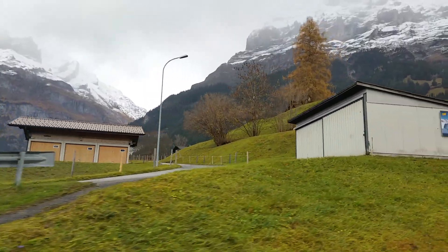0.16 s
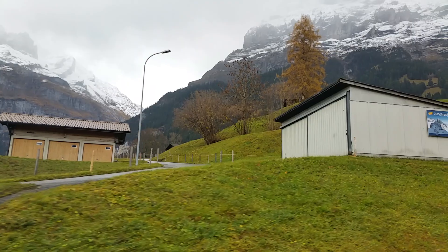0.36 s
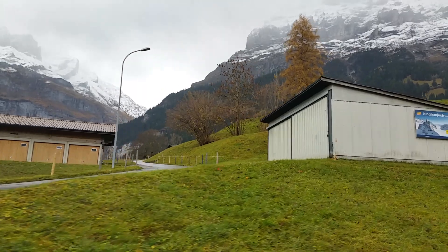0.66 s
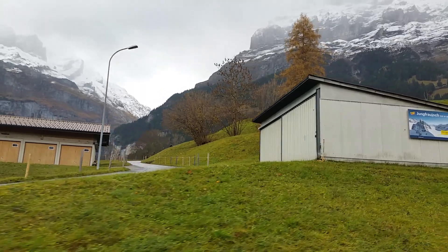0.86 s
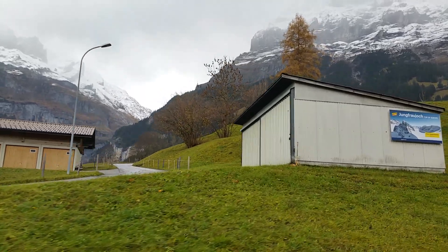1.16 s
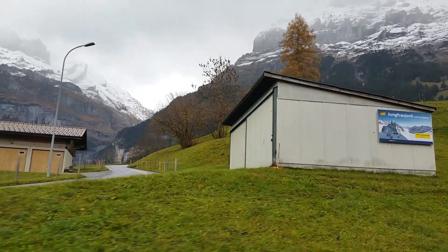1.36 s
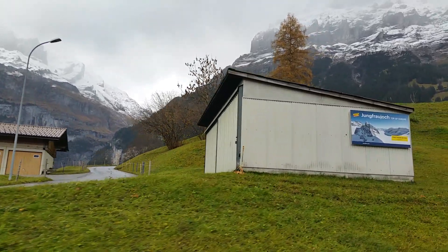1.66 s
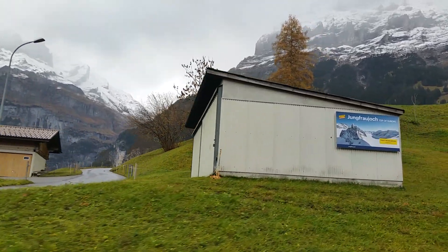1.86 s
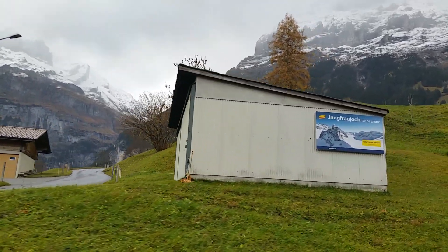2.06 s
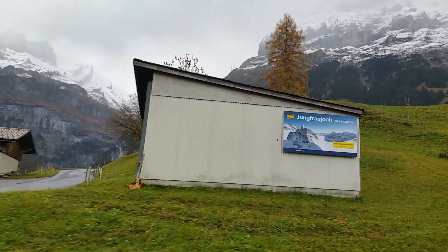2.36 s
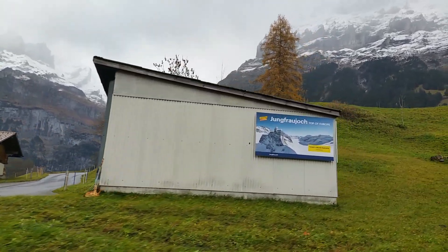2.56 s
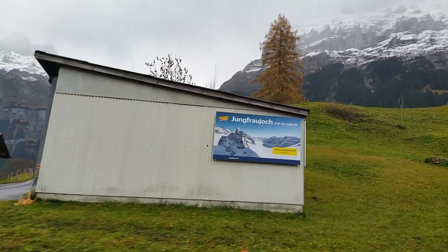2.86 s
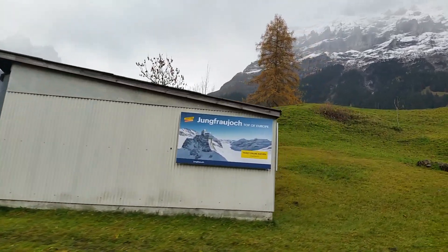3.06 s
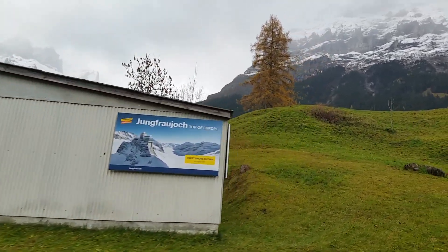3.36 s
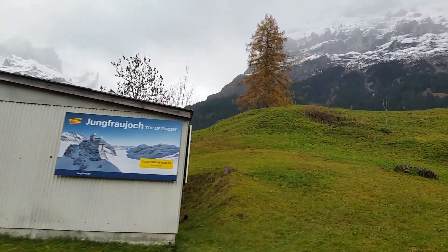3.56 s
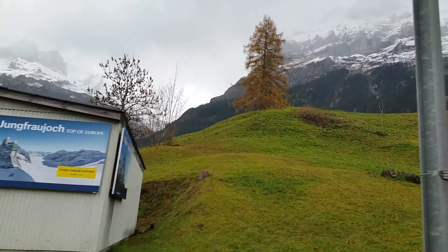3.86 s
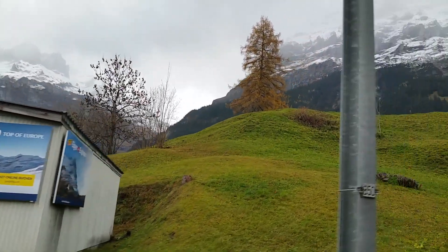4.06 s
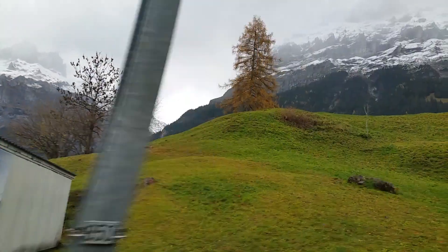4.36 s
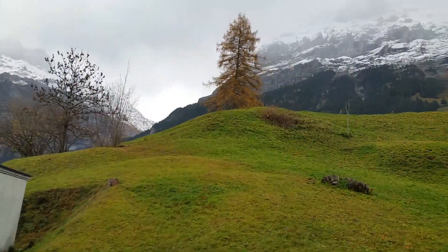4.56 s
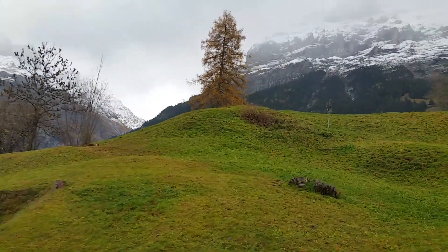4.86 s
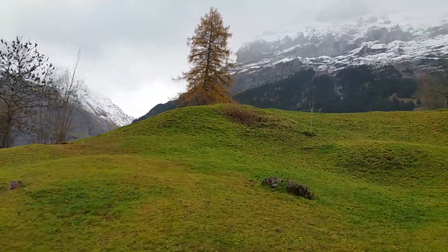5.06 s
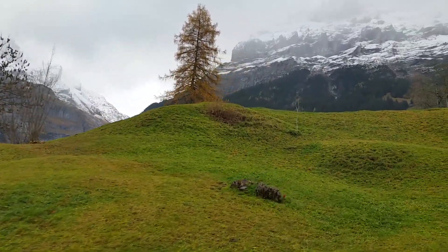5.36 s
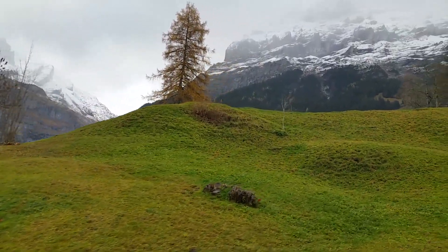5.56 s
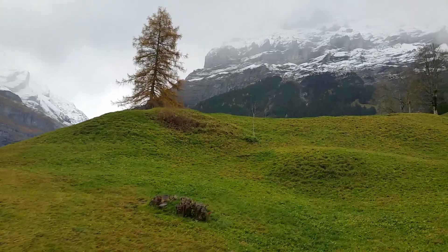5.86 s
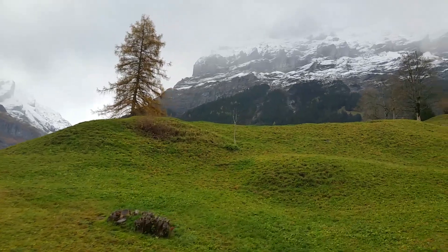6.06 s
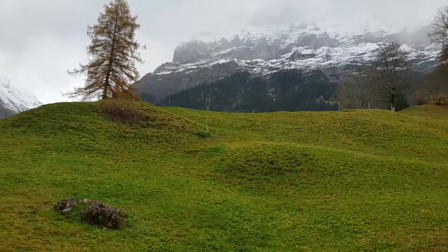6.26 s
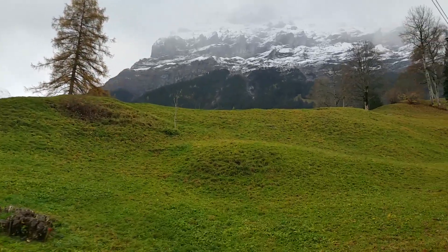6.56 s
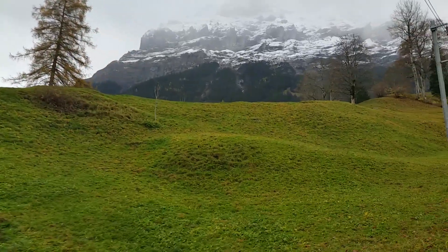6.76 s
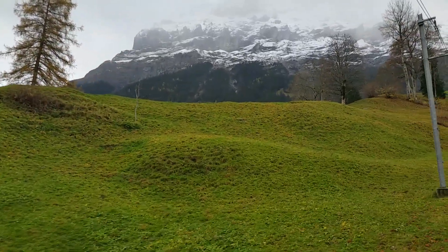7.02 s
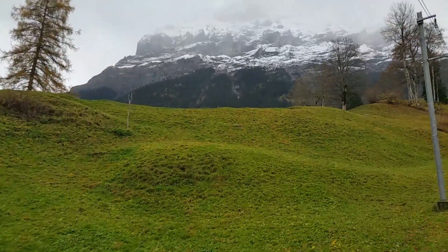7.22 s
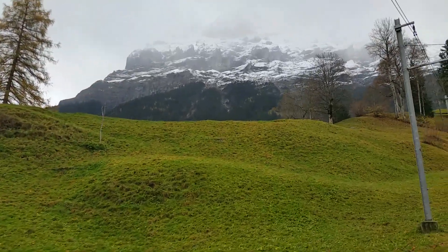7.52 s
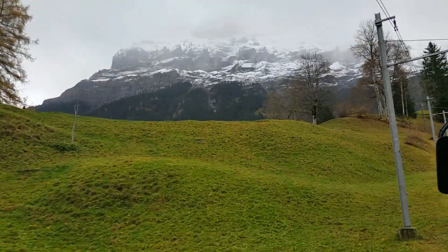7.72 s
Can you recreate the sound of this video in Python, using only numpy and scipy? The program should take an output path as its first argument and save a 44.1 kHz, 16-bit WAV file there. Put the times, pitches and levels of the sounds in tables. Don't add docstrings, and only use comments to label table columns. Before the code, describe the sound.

A steady low electric hum with a rough, throbbing edge over rumbling wheels and gusty hiss, with two dull knocks near the middle.

```python
import sys
import numpy as np
from scipy import signal
from scipy.fft import rfft, irfft, next_fast_len
from scipy.io import wavfile

SR = 44100
rng = np.random.default_rng(int(sys.argv[2]) if len(sys.argv) > 2 else 0)


def store_wav(level_fs):
    pcm = np.round(np.clip(np.atleast_2d(level_fs), -1, 1) * 32767)
    wavfile.write(sys.argv[1], SR, pcm.T.astype(np.int16))


def volts(x):
    e = np.asarray(x, float) / 20
    return 10 ** e


N = 347949
SIZE = next_fast_len(N)
HZ = np.arange(SIZE // 2 + 1) * SR / SIZE
STEP = 8

# time in seconds, teeth per second in Hz.
TOOTH_RATE = [(0.0, 55.26), (1.0, 55.08), (2.0, 54.93), (3.0, 54.7), (4.0, 54.48), (5.0, 54.22),
              (6.0, 54.04), (7.0, 53.88), (7.89, 53.83)]
TOOTH_ORDERS = [1, 2, 4, 5, 6, 7, 8, 9, 10, 11, 13, 14]
# line level early, midway and late in dB, rough skirt in dB.
TOOTH_LEVELS = [(-37, -51, -81, -37.5), (-25.5, -29, -32.5, -57), (-34, -28.5, -29.5, -38.5),
                (-29.5, -45.5, -40.5, -34), (-31, -33.5, -31, -36), (-41, -40, -45, -44.5),
                (-40.5, -50, -47, -45), (-40, -55.5, -42, -42.5), (-48.5, -41.5, -45, -42),
                (-48, -79, -55, -56), (-58, -45, -57, -49), (-60, -61, -54, -44.5)]
GEAR_ORDERS = [4.11, 4.855, 5.87, 6.1, 9.15, 12.2, 17.213, 18.3, 24.4, 27.45, 34.43]
# line level early, midway and late in dB, rough skirt in dB.
GEAR_LEVELS = [(-39.5, -32, -36, -51), (-44, -33.5, -40, -42), (-36, -55, -38, -68),
               (-24.5, -43.5, -37.5, -45), (-50, -33.5, -66, -46), (-33, -35.5, -41, -44.5),
               (-48, -43, -39.5, -49.5), (-57, -52, -43.5, -61), (-75, -51, -43.5, -49),
               (-65, -49, -53.5, -57), (-83, -60, -68, -47.5)]
# time in seconds, level of the third tooth tone in dB.
EFFORT = [(0.0, -20), (1.31, -17.6), (2.63, -25.5), (3.94, -23.5), (5.26, -19), (6.57, -19.5), (7.89, -19)]
# time in seconds, change in dB, half length in seconds.
SNATCHES = [(0.48, -10, 0.029), (0.95, -9, 0.032), (1.09, -9.2, 0.018), (1.72, -2, 0.034),
            (2.04, 4.9, 0.13), (2.24, 4.5, 0.06), (2.37, 3, 0.04), (2.74, 7.1, 0.038), (3.02, -26, 0.018),
            (3.18, 8, 0.16), (3.41, 5.0, 0.027), (3.49, -6, 0.025), (3.6, 7, 0.075), (4.2, 4.5, 0.067),
            (4.4, 8, 0.046), (4.56, -4.8, 0.054), (4.98, 4, 0.19), (5.45, 2.5, 0.084), (6.14, 4, 0.051),
            (6.48, 3.5, 0.04), (6.75, -4, 0.11), (7.13, -7, 0.046)]

# frequency in Hz, level in dB per Hz.
RUMBLE_SPECTRUM = [(20, -71), (35, -60), (52, -45), (75, -52.5), (100, -52.5), (140, -47.5), (190, -50.5),
                   (300, -57.5), (420, -59), (620, -56.5), (800, -60), (1100, -69), (1600, -70.5),
                   (2300, -75)]
# frequency in Hz, width in Hz, level in dB.
CASING_RESONANCES = [(64, 8, -7.5), (154, 21, 5), (169.5, 8.2, 0), (212, 33, 3.5), (688, 33, 1.5),
                     (752, 12, -12.5), (843, 24, 1.5), (1184, 18, 5), (1450, 48, 4.5), (1660, 30, 2.5),
                     (2004, 48, 4), (2380, 23, 6.5)]
# time in seconds, rumble change in dB, whir change in dB, half length in seconds.
SHUDDERS = [(.12, 0.5, 0.5, 0.033), (.32, 1, 2, 0.099), (.54, 1, -2.5, 0.16), (1.79, 1.5, 2, 0.017),
            (2.15, 0.3, 2.2, 0.08), (2.52, 2, -0.5, 0.044), (3.7, 0, 3, 0.12), (3.868, 3, 6, 0.012),
            (4.02, 0, 1, 0.11), (4.274, 3.5, 5, 0.015), (5.36, 0.9, -2.2, 0.088), (6.43, 5.5, 2, 0.018),
            (6.81, 1, -0.9, 0.37), (7.32, 0.5, -2, 0.026)]

# frequency in Hz, level in dB per Hz.
HISS_LEFT = [(2300, -83.0), (2800, -81.1), (3300, -84.5), (3950, -79.8), (5000, -82.8), (6200, -87.0),
             (7000, -92.2), (7700, -95.2), (8300, -89.1), (9000, -85.6), (10500, -85.8), (12500, -88.7),
             (14000, -90.9), (14500, -92.7)]
# frequency in Hz, level in dB per Hz.
HISS_RIGHT = [(2750, -81.5), (3350, -83.0), (4100, -72.8), (5000, -70.4), (5800, -74.1), (6800, -83.2),
              (7700, -95.3), (8300, -87.8), (9200, -86.0), (10100, -89.2), (10900, -96.3), (12800, -88.2),
              (14000, -91.9), (14500, -93.0)]
# time in seconds, hiss level in dB.
AIR = [(0, -47.5), (1.3, -46), (2.6, -43.5), (3.95, -42.5), (5.25, -45.5), (6.6, -45.5), (7.89, -47)]
# time in seconds, change in dB, half length in seconds.
PUFFS = [(.06, -3.5, 0.045), (.77, -1.5, .06), (.97, 3.5, .015), (1.14, 2.2, 0.028), (1.31, 4, .04),
         (1.69, 4.2, .025), (2.17, 2.2, 0.11), (2.43, 2, .04), (2.92, 2.5, 0.027), (3.17, 3, .04),
         (3.44, 2.4, .04), (3.67, 3, 0.02), (4.3, 3.5, 0.052), (4.4, -5, 0.013), (4.47, 5, .025),
         (4.73, 5, 0.068), (4.88, 4.5, 0.053), (5.16, 3.5, .04), (5.61, 2.5, 0.15), (5.97, 1.9, .06),
         (6.31, 3.1, 0.068), (6.45, -3, .025), (7.25, -2, 0.073), (7.45, 3.5, 0.022), (7.54, -2.5, 0.028)]
# time in seconds, level in dB, length in seconds, left minus right in dB.
GUSTS = [(.19, -28, 0.018, 4), (.85, -25, .04, 2), (0.956, -35, .02, 4), (3.68, -36, .02, -4),
         (6.6, -30, 0.055, 1), (7.626, -31.5, 0.09, 5)]

# time in seconds, level in dB, bright share in dB, deep share in dB.
JOINTS = [
    (3.856, -20, 4, -20),
    (3.859, -10.5, -8, -22),
    (3.8795, -10, -22, -20),
    (4.2645, -8, -6, -15),
    (4.282, -24, -8, 2),
    (4.296, -23, -9, 8),
    (4.325, -30, 0, 11),
    (4.355, -25, -12, 9),
]
# frequency in Hz, level in dB, time to fall 60 dB in seconds.
FLOOR_MODES = [(160, -2, .05), (230, 0, .07), (290, -4, .06), (400, -9, .04)]
# frequency in Hz, level in dB, time to fall 60 dB in seconds.
WHEEL_MODES = [(540, -3, .05), (660, -8, .05), (1050, -6, .06), (1450, -16, .05)]
# frequency in Hz, level in dB, time to fall 60 dB in seconds.
DEEP_MODES = [(50.2, 3, .4), (59, -6, .23), (71.7, -2.5, .2)]

# frequency in Hz, left minus right in dB.
LEAN = [(40, -7), (110, -4), (165, -5.5), (370, -3.5), (670, -2), (1200, -2.5), (2300, -3)]
# frequency in Hz, share from 0 to 1.
ALIKE = [(30, 0.67), (80, 0.69), (150, 0.84), (300, 0.78), (470, 0.57), (700, 0.82), (1100, 0.58),
         (1800, 0.54), (2300, 0.15)]
# time in seconds, lag in samples.
RIGHT_LAG = [(0, 10), (5, 10), (7.89, 5)]


def rms_one(x):
    return x / np.sqrt(np.mean(np.abs(x) ** 2) + 1e-20)


def in_time(rows):
    s, *columns = np.transpose(rows)
    return [np.interp(np.arange(N) / SR, s, c) for c in columns]


def at_hz(points, hz):
    table_hz, values = np.array(points).T
    return np.interp(np.log(hz + 1), np.log(table_hz), values)


def drift(rate_hz, step=1):
    r = np.exp(-2 * np.pi * 64 * rate_hz / SR)
    slow = signal.lfilter([1], [1, -2 * r, r * r], rng.standard_normal(N // 64 + 2002))[2000:]
    return np.interp(np.arange(0, N, step) / 64, np.arange(len(slow)), rms_one(slow))


def bumps(rows, column=1):
    t = np.arange(0, N + 64, 64) / SR
    db = sum(row[column] * np.exp(-((t - row[0]) / row[-1]) ** 2) for row in rows)
    return np.interp(np.arange(N) / SR, t, db)


def throb(turns, swing_db, lag):
    return swing_db * np.cos(2 * np.pi * (turns / 20 - lag))


def split(spectrum, edges):
    below = [0] + [1 / (1 + (HZ / edge) ** 10) for edge in edges] + [1]
    return [irfft(spectrum * (upper - lower), SIZE)[:N] for lower, upper in zip(below, below[1:])]


def order_tone(turns, order, line_db, skirt_db, skirt_hz):
    phase = 2 * np.pi * (order * turns + 0.036 * order ** 2)
    strength = volts(line_db) * np.sqrt(2) + volts(skirt_db) * drift(skirt_hz, STEP)
    timing_shake = volts(skirt_db) * drift(skirt_hz, STEP)
    return strength * np.cos(phase) + timing_shake * np.sin(phase)


def drive(turns, third_db):
    turns = turns[::STEP] + 0.004 * drift(2.8, STEP)
    out = order_tone(turns, 3, third_db[::STEP] - 0.6, skirt_db=-36.5, skirt_hz=18.0)
    place = np.linspace(0, 1, len(turns))
    teeth = (TOOTH_ORDERS, TOOTH_LEVELS, 1.5, 1.5)
    gears = (GEAR_ORDERS, GEAR_LEVELS, 2.2, 3.0)
    for orders, rows, wander_db, wander_hz in (teeth, gears):
        for order, (*levels, skirt_db) in zip(orders, rows):
            line_db = np.interp(place, [0, 0.5, 1], levels) + wander_db * drift(wander_hz, STEP)
            out += order_tone(turns, order, line_db, skirt_db, skirt_hz=11.1)
    return signal.resample_poly(out, STEP, 1)[:N]


def body(turns):
    t = np.arange(N) / SR
    shake_db, shake_hz = 0.9, 4.2
    shed_db = 2 / (1 + np.exp((t - 5) / 0.41 * 2))
    rumble_db = shed_db - 0.3 * t / t[-1] + bumps(SHUDDERS)
    whir_db = 0.5 * t / t[-1] + bumps(SHUDDERS, column=2) + throb(turns, 0.2, lag=0.055)
    return rumble_db + shake_db * drift(shake_hz), whir_db + shake_db * drift(shake_hz)


def rumble(turns, rumble_db, whir_db):
    casing_db = sum(level_db / (1 + (2 * (HZ - hz) / width) ** 2) for hz, width, level_db in CASING_RESONANCES)
    gain = volts(at_hz(RUMBLE_SPECTRUM, HZ) + 2.5 + casing_db) * np.sqrt(SR / 2)
    gain = gain / (1 + (HZ / 2450) ** 16)
    low, middle, whir = split(rfft(rng.standard_normal(N), SIZE) * gain, (330, 1000))
    pulse = 1 + 0.041 * np.cos(2 * np.pi * turns)
    low = low * volts(0.74 * drift(1.0) + np.linspace(0, -2.5, N))
    middle = middle * pulse * volts(1.93 * (rumble_db - rumble_db.mean()))
    return low + middle + whir * volts(1.04 * (whir_db - whir_db.mean()))


def hiss(level_db):
    out = np.zeros((2, N))
    grit_db = 0.58 * drift(36.0) + 0.3 * drift(24.0)
    swell_db = level_db - level_db.mean() + grit_db
    for side, spectrum in enumerate((HISS_LEFT, HISS_RIGHT)):
        gain = volts(at_hz(spectrum, HZ) + 0.5) * np.sqrt(SR / 2) / (1 + (2300 / (HZ + 1)) ** 12)
        bands = split(rfft(rng.standard_normal(N), SIZE) * gain, (3200, 5200, 7700, 11000))
        bands[0] = bands[0] * volts(4.0)
        for band, follow in zip(bands, (0.54, 0.77, 1.28, 0.88, 0.49)):
            flicker_db = 1.0 * drift(17.0)
            out[side] += band * volts(follow * swell_db + flicker_db)
    return out


def wind():
    t, out = np.arange(N) / SR, np.zeros((2, N))
    low_band = signal.butter(2, [36, 110], "band", fs=SR, output="sos")
    for side in (0, 1):
        level = volts(-47 + 2.0 * drift(4.3))
        for s, level_db, length, lean_db in GUSTS:
            level = level + volts(level_db + lean_db * (1.0 - side)) * np.exp(-((t - s) / length) ** 2)
        out[side] = level * rms_one(signal.sosfilt(low_band, rng.standard_normal(N)))
    return out


def ring(clicks, modes):
    out = 0
    for hz, level_db, t60 in modes:
        r, w = volts(-60 / (t60 * SR)), 2 * np.pi * hz / SR
        resonator = [1, -2 * r * np.cos(w), r * r]
        out = out + volts(level_db) * signal.lfilter([0, np.sin(w)], resonator, clicks + 1e-18)
    return out


def joints():
    out = np.zeros(N)
    struck = ((FLOOR_MODES, None, 450), (WHEEL_MODES, 2, 1700), (DEEP_MODES, 3, 120))
    for modes, column, soft_hz in struck:
        clicks = np.zeros(N)
        for row in JOINTS:
            share_db = row[column] if column else 0
            clicks[round(row[0] * SR)] = -volts(row[1] + share_db)
        soften = signal.butter(2, soft_hz, fs=SR, output="sos")
        out += ring(signal.sosfilt(soften, clicks), modes)
    return signal.sosfilt(signal.butter(2, 42, "high", fs=SR, output="sos"), out)


def microphones(direct, rough, other):
    alike = np.clip(at_hz(ALIKE, HZ), 0, 1)
    lean = volts(at_hz(LEAN, HZ) / 2)
    mid = rfft(direct, SIZE) + np.sqrt((1 + alike) / 2) * rfft(rough, SIZE)
    side = np.sqrt((1 - alike) / 2) * rfft(other, SIZE)
    turn = np.exp(-1j * 0.45 * HZ / (HZ + 150))
    left = irfft((mid + side) * lean * turn, SIZE)[:N]
    right = irfft((mid - side) / lean, SIZE)[:N]
    samples = np.arange(N)
    return np.array([left, np.interp(samples - in_time(RIGHT_LAG)[0], samples, right)])


def gate(x):
    hz, _, bins = signal.stft(x, SR, "cosine", 2048, scaling="psd")
    shift_db = np.repeat(1.5 * rng.standard_normal((2, 41, bins.shape[2])), 25, axis=1)
    step = volts(-87 + shift_db)
    size = np.abs(bins) + 1e-12
    rounded = bins / size * step * np.floor(size / step + 0.4)
    kept = np.where((hz > 6000)[:, None], rounded, bins)
    return signal.istft(kept, SR, "cosine", 2048, scaling="psd")[1][:, :N]


def scene():
    turns = np.cumsum(in_time(TOOTH_RATE)[0]) / SR
    load_db = in_time(EFFORT)[0] + throb(turns, 2.0, lag=0.17) + bumps(SNATCHES)
    air_db = in_time(AIR)[0] + throb(turns, 0.93, lag=0.08) + bumps(PUFFS)
    rumble_db, whir_db = body(turns)
    rough = rumble(turns, rumble_db, whir_db)
    other = rumble(turns, rumble_db, whir_db)
    train = microphones(drive(turns, load_db) + joints(), rough, other)
    return train + hiss(air_db) + wind()


def low_pass(x):
    return signal.sosfilt(signal.butter(12, 14440, fs=SR, output="sos"), x)


def record(dry):
    capsule = signal.sosfilt(signal.butter(2, 36, "high", fs=SR, output="sos"), dry)
    mix = gate(1.087 * np.tanh(capsule / 1.104))
    return low_pass(mix)


dry = scene()
out = record(dry)
store_wav(out)
```